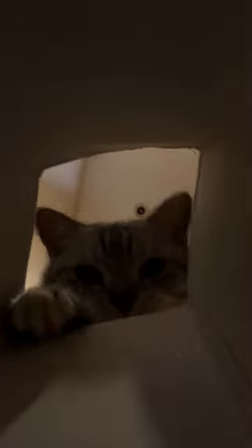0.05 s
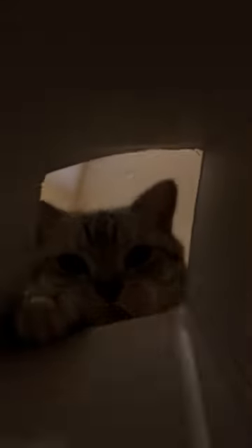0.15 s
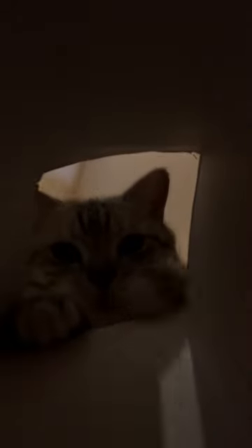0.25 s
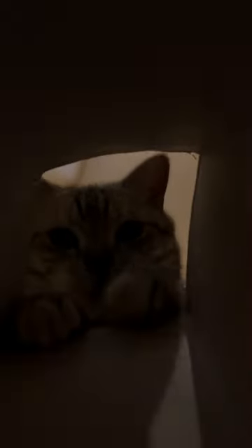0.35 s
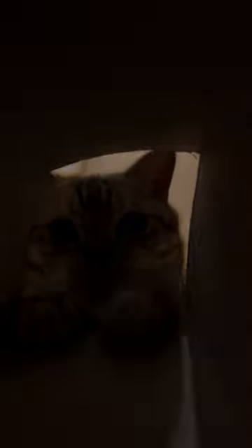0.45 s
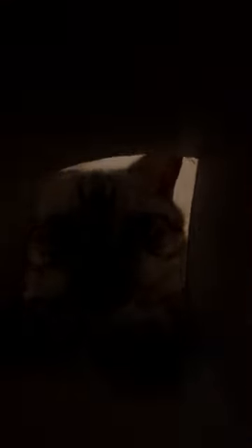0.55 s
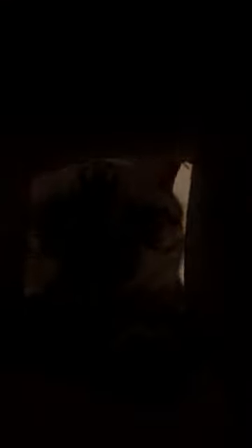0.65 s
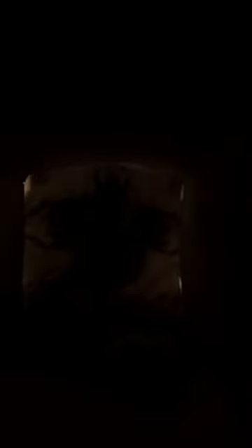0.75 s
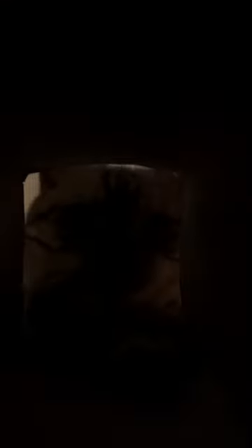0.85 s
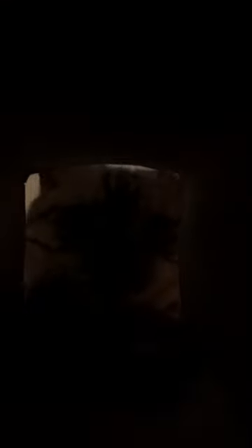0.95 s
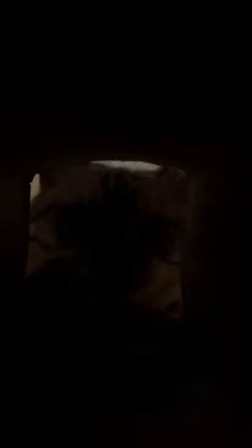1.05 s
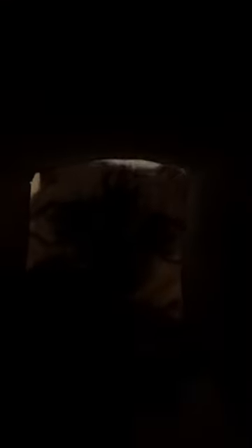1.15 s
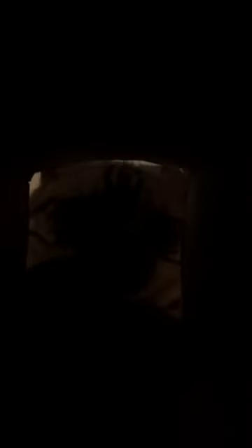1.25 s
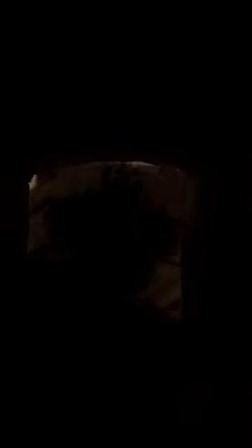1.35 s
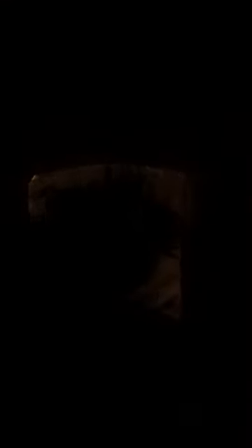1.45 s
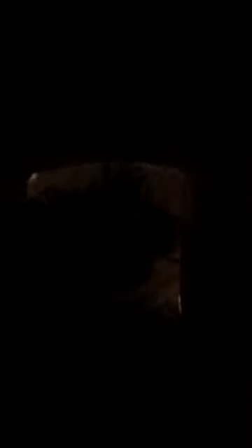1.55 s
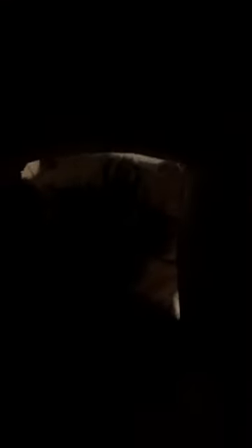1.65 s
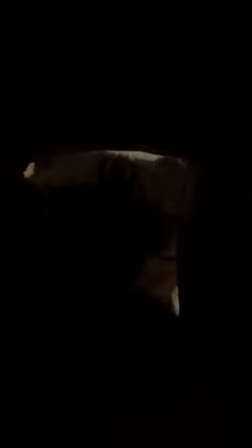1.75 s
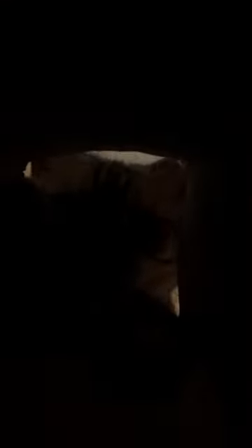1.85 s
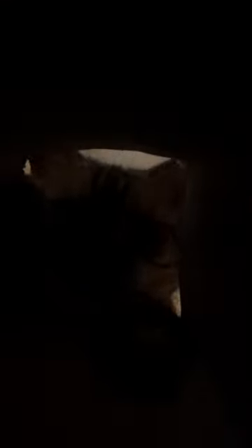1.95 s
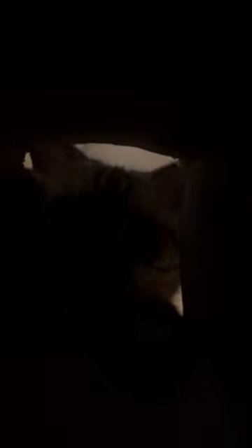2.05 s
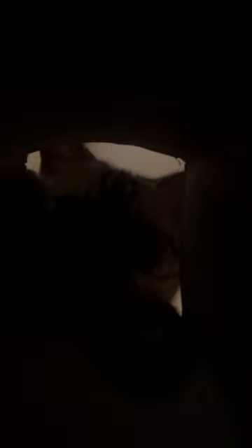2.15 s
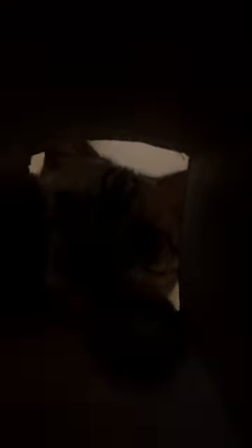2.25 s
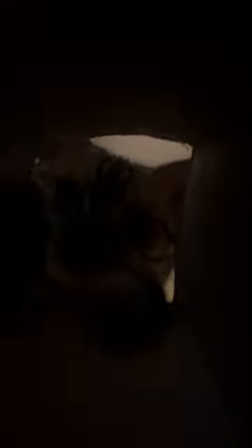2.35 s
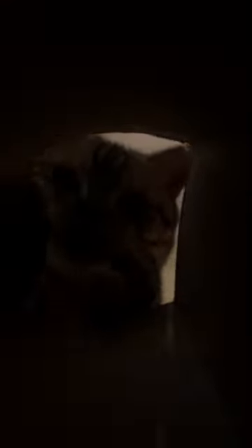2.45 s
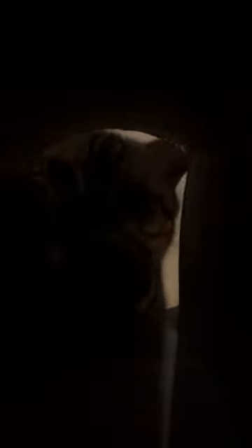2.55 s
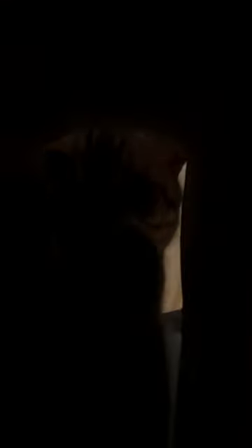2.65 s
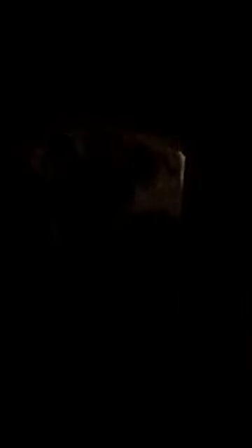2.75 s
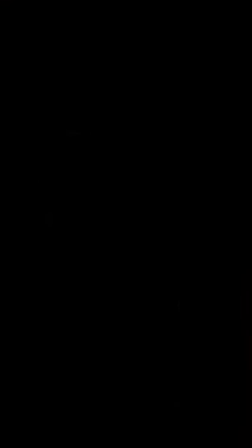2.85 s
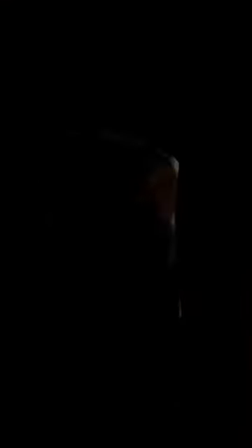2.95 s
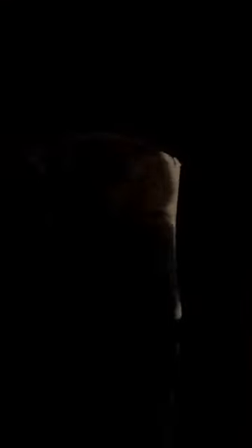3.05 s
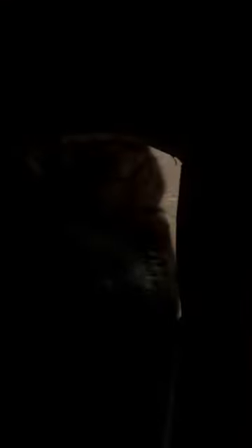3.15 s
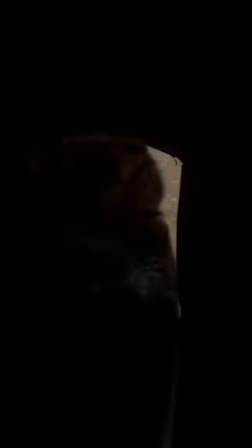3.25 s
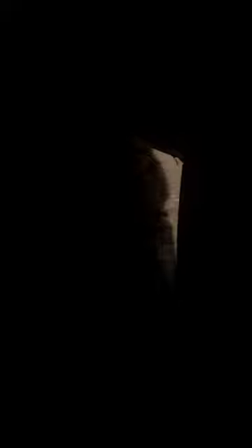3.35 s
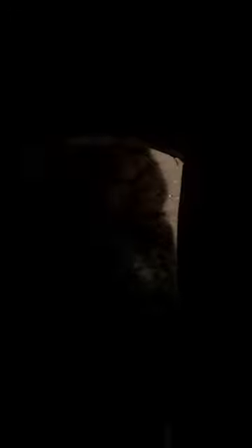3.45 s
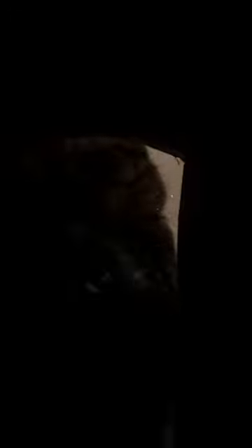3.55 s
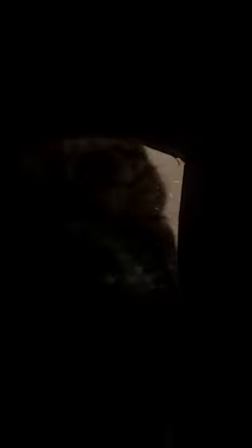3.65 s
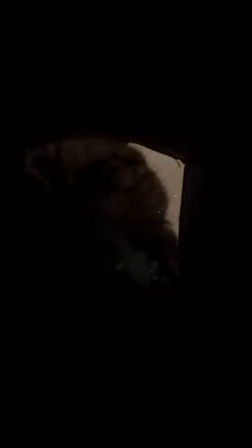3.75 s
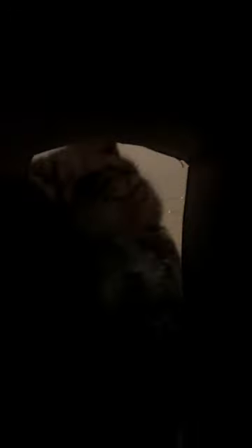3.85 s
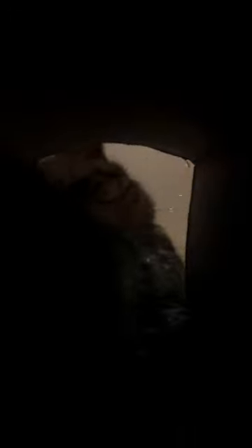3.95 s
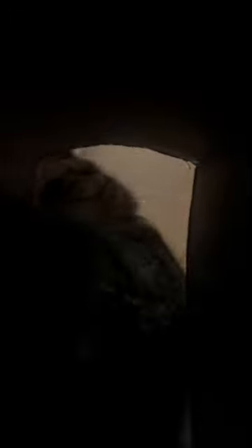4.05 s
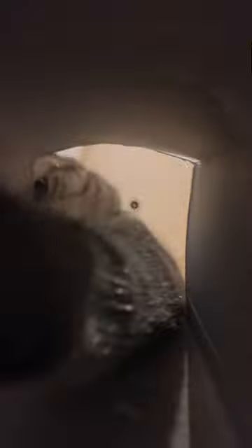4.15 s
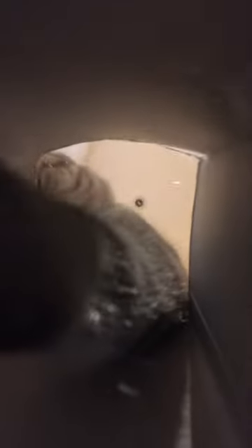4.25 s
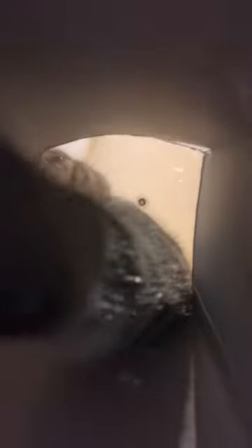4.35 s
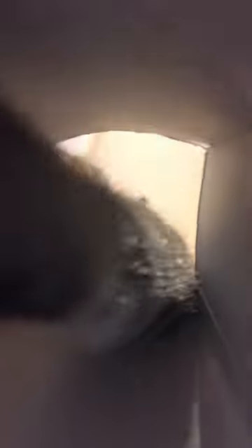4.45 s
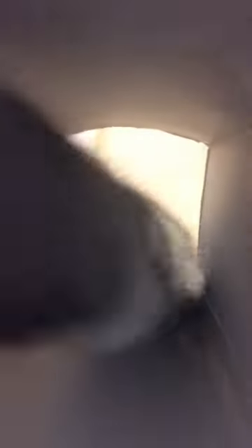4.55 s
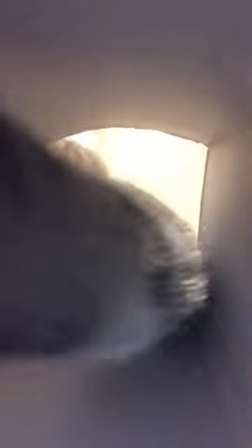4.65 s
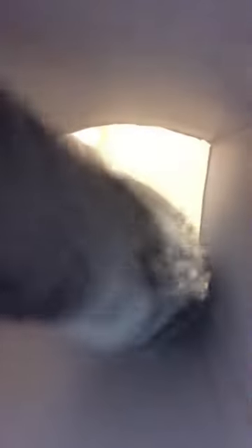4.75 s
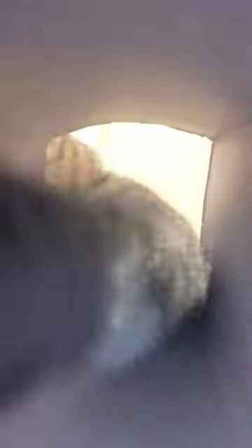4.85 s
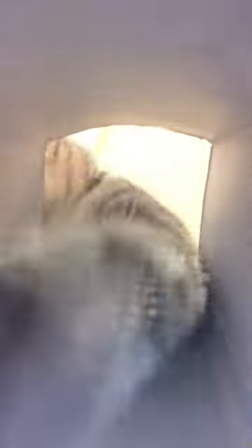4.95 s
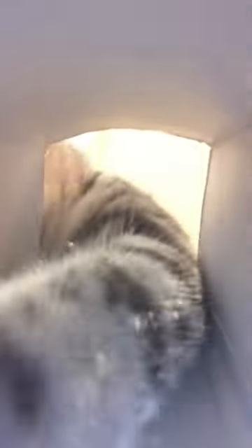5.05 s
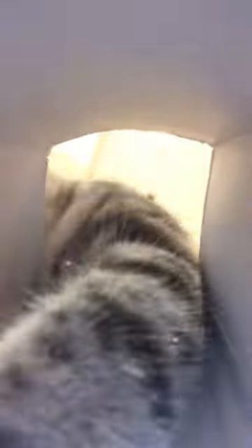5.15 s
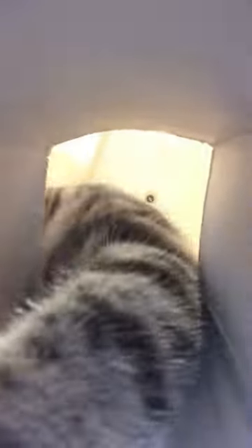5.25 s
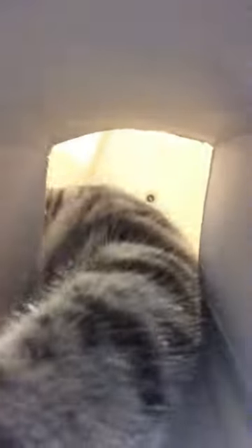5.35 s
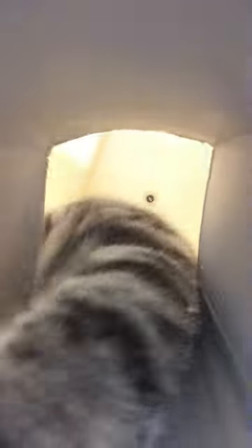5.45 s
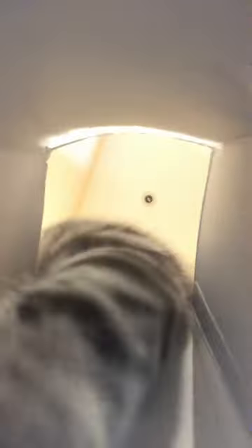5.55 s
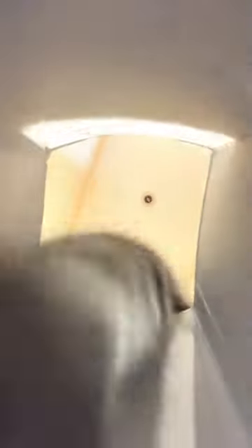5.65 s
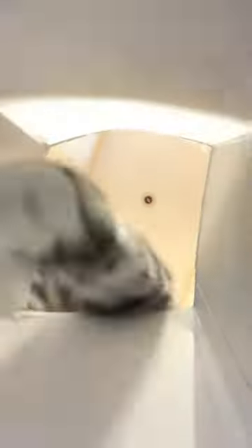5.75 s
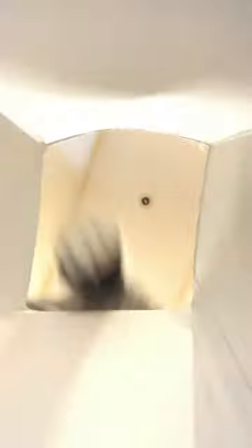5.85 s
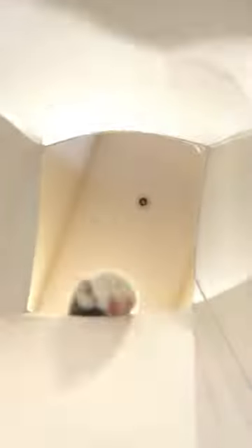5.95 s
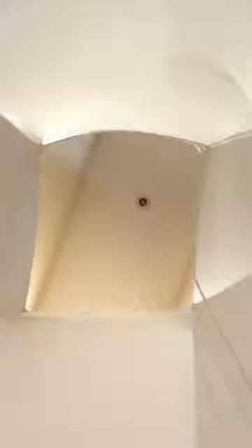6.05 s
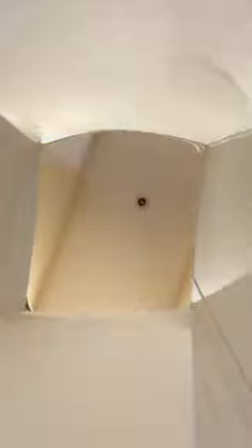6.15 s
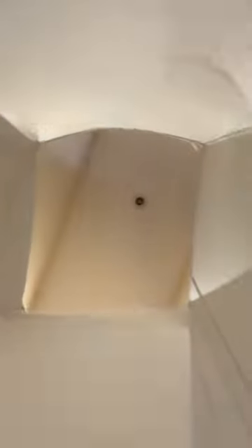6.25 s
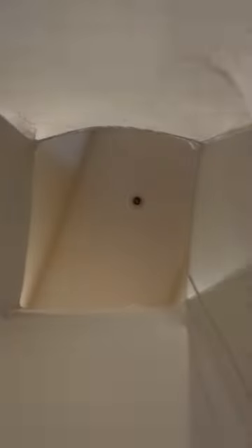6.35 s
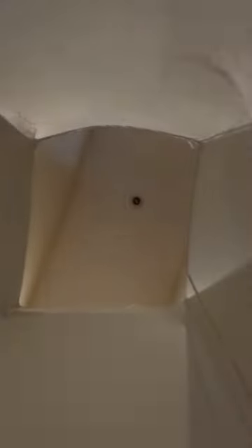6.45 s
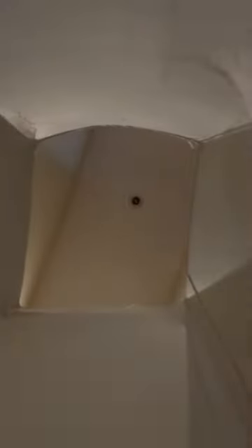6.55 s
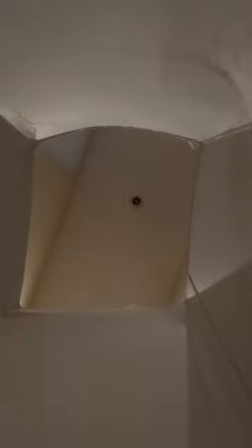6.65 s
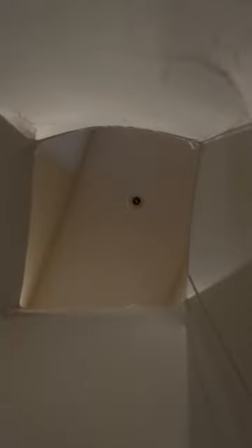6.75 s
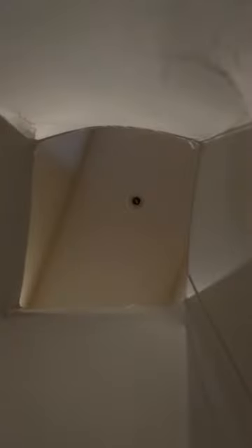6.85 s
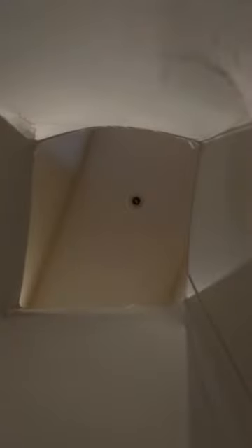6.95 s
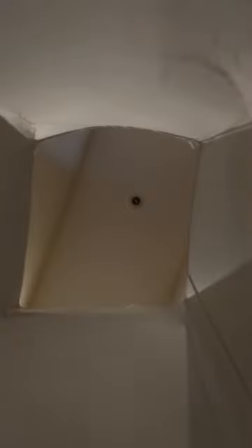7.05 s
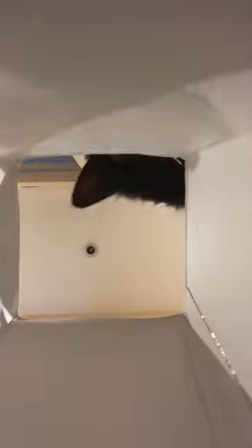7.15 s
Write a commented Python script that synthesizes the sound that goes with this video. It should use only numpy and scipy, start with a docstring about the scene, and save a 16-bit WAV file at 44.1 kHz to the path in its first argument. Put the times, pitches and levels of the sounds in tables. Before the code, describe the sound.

Close, hollow taps, claw clicks and fur dragging on cardboard as a cat reaches into a box, with soft ventilation behind.

```python
"""Inside a cardboard box, as a cat bats, claws and rubs its way in.
Pads thump, claw tips click and scratch, fur drags over the card in tiny stick-slips.
Each contact crosses the card as a bending wave, treble first, so a tap is a short falling chirp.
The panels boom and ring briefly; ventilation noise and a low room hum lie behind."""
import sys
import numpy as np
from scipy import signal
from scipy.fft import rfft, irfft, next_fast_len
from scipy.io import wavfile
from scipy.ndimage import map_coordinates

SR = 44100
rng = np.random.default_rng(int(sys.argv[2]) if len(sys.argv) > 2 else 0)


def transcribe(u):
    """Save the signal u as a 16-bit wav file named by the first command-line argument.

    u: samples, shape (n,) or (channels, n), limited to [-1, 1]; the rate is SR.
    q: integer samples, one column per channel.
    """
    v = np.clip(np.atleast_2d(u).T, -1, 1)
    q = np.round(v * 32767).astype(np.int16)
    wavfile.write(sys.argv[1], SR, q)


N = 317961
TIME_S = np.arange(N) / SR

# Table levels are relative.
# ventilation spectrum: f/Hz, level/dB
VENT_SPECTRUM = [(25, -51), (60, 10.5), (110, -20), (200, -3.5), (360, -2), (560, -5.5), (760, -2),
                 (1100, -15.5), (1900, -29), (3000, -27.5), (5000, -38.5), (7500, -35), (11000, -37),
                 (16000, -37.5)]
# air modes of the box: f/Hz, width/Hz, level/dB
AIR_MODES = [(640, 56, -17), (661, 260, -4), (1230, 160, 1), (1487, 260, 6.5), (2160, 170, 5),
             (2520, 92, 6), (4940, 450, 8)]
# hum tones: f/Hz, level/dB
HUM_TONES = [(110, -43.5), (90.4, -49.5), (120, -52.5), (193, -62)]
# steady rubbing as the cat leans in: t/s, level/dB
LEAN_CURVE = [(0, -41.5), (0.6, -40.5), (0.88, -48.5), (1.4, -46), (1.57, -34), (1.78, -46), (2.6, -48),
              (2.9, -35), (3.17, -45.5), (3.7, -40), (4.1, -33), (4.48, -31), (4.72, -37), (5.05, -39.5),
              (5.28, -51), (5.65, -38), (6.15, -45.5), (7.1, -44)]
# leg sweeps: centre t/s, half-height width/s, rub level/dB, hiss re rub/dB
LEG_SWEEPS = [(0.22, 0.26, -60, -6), (0.58, 0.4, -49, -11), (1.028, 0.079, -35, -35),
              (1.448, 0.12, -37, -4.5), (1.668, 0.096, -31, -30), (1.988, 0.11, -32, -27),
              (2.222, 0.11, -36, -20.5), (2.348, 0.14, -41.5, -12.5), (2.762, 0.15, -31, -17),
              (2.868, 0.077, -22.5, -19), (3.108, 0.031, -19.5, -18.5), (3.225, 0.035, -24, -22),
              (3.582, 0.022, -34.5, -19), (3.792, 0.052, -26, -38), (4.038, 0.023, -43.5, 4),
              (4.172, 0.047, -38.5, -5.5), (4.318, 0.04, -30, -31), (4.808, 0.11, -29, -22),
              (5.128, 0.11, -32.5, -16), (5.462, 0.069, -32.5, -27), (5.568, 0.1, -30.5, -16),
              (5.708, 0.077, -35, -14), (5.952, 0.18, -36, -11), (6.89, .07, -47.5, -33)]
# low friction band: f/Hz, level/dB
RASP_SPECTRUM = [(40, -15), (100, -5.5), (200, -5), (380, -1), (580, -8.5), (900, -15), (1400, -18.5),
                 (2500, -27), (4300, -30.5), (6500, -42.5)]
# middle friction band: f/Hz, level/dB
SCRATCH_SPECTRUM = [(700, -16.5), (1600, -5.5), (2400, -4.5), (3200, -9.5), (4400, -11), (7000, -22),
                    (12000, -32)]
# high friction band: f/Hz, level/dB
HISS_SPECTRUM = [(1500, -5), (3000, -5), (4800, -2), (7000, -5.5), (11000, -6.5), (15000, -9.5),
                 (17000, -37)]
# paw blows: t/s, level/dB, corner f/Hz, treble roll-off/(dB/oct)
PAW_TAPS = [(0.1025, 24.5, 313, 8.5), (0.1305, 11.5, 202, 3), (0.3377, 23, 525, 10.5), (0.483, 21, 680, 20),
            (0.916, 24, 344, 8.5), (0.9603, 21.5, 378, 12.5), (1.0093, 19.5, 127, 3.5),
            (1.0197, 26.5, 315, 12), (1.0465, 33.5, 610, 15.5), (1.1168, 24, 370, 5.5),
            (1.516, 30.5, 386, 12), (1.6135, 28, 310, 12), (1.6458, 41, 235, 12), (1.6628, 23.5, 225, 4.5),
            (1.8265, 21, 211, 13.5), (1.9332, 25.5, 148.3, 7.5), (1.952, 31.5, 244, 14),
            (2.014, 24, 120, 7), (2.538, 40, 150, 20.5), (2.8095, 40, 484, 11), (2.8126, 39.5, 129, 11.5),
            (2.8438, 32.5, 380, 9.5), (2.9122, 38, 200, 6), (2.9322, 32, 115, 5), (2.969, 31.5, 115, 7),
            (2.9892, 37, 472, 14), (3.0624, 25, 604, 7), (3.0786, 33.5, 130, 5.5), (3.1008, 34, 422, 22),
            (3.1482, 11.5, 900, 6.5), (3.205, 33, 195, 8.5), (3.2498, 33, 139, 7), (3.2818, 14, 546, 5.5),
            (3.328, 28.5, 121, 4.5), (3.351, 39, 148, 9), (3.3991, 41, 540, 13.5), (3.416, 30.5, 109.4, 20),
            (3.5158, 27.5, 595, 15), (3.5255, 38, 473, 8), (3.529, 36.5, 126, 12), (3.5535, 34, 463, 15.5),
            (3.6315, 19.5, 330, 5), (3.7948, 46, 320, 18.5), (3.812, 37.5, 255, 16),
            (3.8933, 29.5, 477, 10), (3.9272, 32, 310, 6.5), (3.936, 41, 218, 11), (4.0091, 32.5, 140, 5.5),
            (4.1792, 28.5, 265, 22), (4.1937, 30.5, 103, 27), (4.2648, 28, 245, 16), (4.299, 33, 290, 11),
            (4.3543, 24.5, 305, 8), (4.4624, 26.5, 500, 21), (4.5404, 33.5, 158, 6.5), (4.617, 41, 474, 10),
            (4.629, 28, 113, 22), (4.8116, 36, 284, 12), (4.8433, 29.5, 129, 5), (4.8967, 24.5, 129, 6.5),
            (4.9953, 27, 260, 4.5), (5.0272, 40.5, 598, 19), (5.0435, 32, 119.4, 14),
            (5.1127, 41.5, 116, 8), (5.1135, 30.5, 550, 28), (5.117, 47, 85.4, 13.5),
            (5.1345, 32.5, 510, 18.5), (5.521, 46, 140, 12.5), (5.8997, 38, 114, 20),
            (5.9142, 38, 261, 10.5), (5.94, 32, 102, 24), (6.0035, 31, 766, 14.5), (6.0242, 36.5, 287, 19),
            (6.0426, 32, 141, 13), (6.878, 18, 370, 21), (6.951, 13, 356, 11)]
# response of a furry pad: f/Hz, level/dB
PAD_RESPONSE = [(35, 2), (80, 1), (120, -1), (180, -0.5), (270, -1.5), (500, -3.5), (800, -5.5),
                (1300, -3.5), (3000, -12.5), (12000, -17.5)]
# claws snapping free: t/s, level/dB, corner f/Hz, treble roll-off/(dB/oct)
CLAW_CLICKS = [(0.7865, -7, 2900, 13.5), (0.968, -6, 2000, 10), (1.007, -8, 2000, 4.5),
               (1.047, 8.5, 1900, 6), (1.0548, 9, 5600, 9.5), (1.1178, 7.5, 1940, 1.5),
               (1.2228, -11, 4200, 3), (1.5798, 0, 2400, 1), (1.5952, 22.5, 2060, 10),
               (1.7096, -0.5, 9000, 7), (1.944, 5.5, 3700, 6.5), (1.9535, -3, 3000, 4),
               (1.985, 12.5, 2520, 3.5), (2.05, -8, 6000, 3), (2.81, 11.5, 3400, 9),
               (2.8139, 18.5, 2000, 8.5), (2.9474, 17, 5070, 6), (2.9646, 7.5, 3600, -1),
               (2.988, 25, 1886, 12.5), (3.0089, 19.5, 1720, 18), (3.0477, 14, 3290, 9.5),
               (3.063, 6, 5050, 11), (3.078, 6, 2400, 11), (3.178, -5, 4760, 12), (3.2145, -0.5, 4200, 15),
               (3.2477, 8.5, 5300, 10), (3.3297, 13.5, 2570, 19), (3.4049, 12.5, 2000, 2),
               (3.5235, 18, 2060, 15), (3.5532, 16.5, 3000, 14.5), (3.8803, -4, 3400, 11),
               (3.894, 10.5, 1650, 18), (3.936, -7, 4800, 4.5), (4.072, 0.5, 5040, 5),
               (4.5755, -4, 4000, 7), (4.586, 4.5, 4870, 8), (4.5972, 10, 2050, 6), (4.8808, 0, 4200, 2.5),
               (4.886, 2.5, 3970, 5.5), (5.0406, 2.5, 4540, 18), (5.507, 9.5, 1880, 11.5),
               (6.2603, -4, 6800, 8)]
# response of a claw tip: f/Hz, level/dB
TIP_RESPONSE = [(250, 2), (1200, 1), (10000, -1.5), (16000, 0), (18000, -20)]
# claw drags: start t/s, end t/s, bite time/s, rasp level/dB, scratch level/dB, hiss level/dB
CLAW_DRAGS = [(1.382, 1.49, 0.11, -35, -51, -52), (2.896, 2.923, 0.02, -14, -30, -31),
              (2.937, 2.958, 0.016, -18.5, -16.5, -19.5), (3.351, 3.404, 0.0062, -20.5, -26, -33),
              (3.997, 4.033, 0.0083, -18, -38.5, -40), (4.647, 4.672, 0.059, -23, -30.5, -53),
              (4.943, 4.994, 0.0034, -20, -31, -37), (5.869, 5.923, 0.008, -24, -40.5, -48),
              (5.991, 6.034, 0.034, -21, -47, -42.5)]
# card panel modes: f/Hz, width/Hz, level/dB
PANEL_MODES = [(102, 48.5, 6), (162, 28, -9), (332, 55, -13), (399, 5.7, -23), (555, 81, 0), (700, 43, -1),
               (821, 22, -6), (1070, 22, -2.5), (1293, 120, -15), (1362, 22, -7), (2050, 170, -17.5),
               (2285, 210, -4), (2510, 72, -23), (3300, 70, -26.5), (4110, 70, -20.5), (4280, 360, -8.5),
               (4700, 228, -20)]


def undb(db):
    """Decibels to gain."""
    return 10 ** (np.asarray(db) / 20)


def unit_rms(x):
    """Scale to rms 1."""
    return x / np.sqrt(np.mean(x ** 2))


def bins_hz(size):
    """FFT bin frequencies, floored at 1 Hz."""
    return np.maximum(np.fft.rfftfreq(size, 1 / SR), 1)


def curve_db(f_hz, points):
    """Interpolate (f/Hz, level/dB) points over log frequency."""
    hz, db = np.transpose(points)
    return np.interp(np.log(f_hz), np.log(hz), db)


def colour(x, points):
    """Filter by (f/Hz, level/dB) points."""
    return irfft(rfft(x) * undb(curve_db(bins_hz(len(x)), points)), len(x))


def wander(rate_hz):
    """Random drift, spread near 1."""
    knots = rng.standard_normal(4096)
    return 1.31 * np.interp(TIME_S * rate_hz, np.arange(len(knots)), knots)


def resonate(x, modes, direct_db):
    """Direct path plus damped modes."""
    f = bins_hz(N)
    response = sum(undb(db) / (1 + 1j * (f * f - hz * hz) / (f * width)) for hz, width, db in modes)
    return irfft(rfft(x) * (undb(direct_db) + response), N)


def ventilation(level_db=-46, waver_db=0.26):
    """Room air noise, coloured by the air in the box."""
    air = resonate(colour(rng.standard_normal(N), VENT_SPECTRUM), AIR_MODES, direct_db=-5.5)
    return unit_rms(air) * undb(level_db + waver_db * wander(3.1))


def hum(waver_db=1.6, drift_hz=1.25, onset_db=-12, rise_s=1.25):
    """Low wavering tones that grow at first."""
    tones = np.zeros(N)
    for hz, db in HUM_TONES:
        rms = undb(db + waver_db * wander(5))
        phase = 2 * np.pi * np.cumsum(hz + drift_hz * wander(3.9)) / SR
        tones += np.sqrt(2) * rms * np.sin(phase)
    return tones * undb(onset_db * np.clip(1 - TIME_S / rise_s, 0, 1))


def friction(spectrum, slips_per_s, spread_db, judder_db, fold_s=0.0012):
    """Fibres catch and slip: a juddering stream of tiny uneven clicks."""
    slips = (rng.random(N) < slips_per_s / SR) * rng.standard_normal(N)
    slips *= undb(spread_db * np.clip(rng.standard_normal(N), -2, 2))
    slips *= undb(judder_db * wander(90))
    # the nearest fold's echo moves with the paw; the card absorbs its treble
    delay_s = fold_s * np.exp(0.35 * wander(9))
    echo = map_coordinates(slips, [(TIME_S - delay_s) * SR], order=0)
    echo = colour(echo, [(2500, -4), (5000, -7), (10000, -14)])
    return unit_rms(colour(slips + echo, spectrum))


def lean_db():
    """Steady rubbing level per sample."""
    return np.interp(TIME_S, *np.transpose(LEAN_CURVE))


def fur(lean_rub_db=-3, lean_hiss_db=-30, sweep_db=-2):
    """Leg and chest slide along the opening: dull rub and fine hiss, swelling with each sweep."""
    rub_power = undb(lean_db() + lean_rub_db) ** 2
    hiss_power = undb(lean_db() + lean_hiss_db) ** 2
    for centre_s, width_s, db, hiss_db in LEG_SWEEPS:
        swell = undb(db + sweep_db) * np.hanning(int(2 * width_s * SR))
        start = int((centre_s - width_s) * SR)
        add(rub_power, swell ** 2, start)
        add(hiss_power, (swell * undb(hiss_db)) ** 2, start)
    rub = friction(RASP_SPECTRUM, slips_per_s=2200, spread_db=1, judder_db=2.5)
    hiss = friction(HISS_SPECTRUM, slips_per_s=10000, spread_db=1.5, judder_db=3.5)
    return np.sqrt(rub_power) * rub + np.sqrt(hiss_power) * hiss


def add(out, x, start):
    """Mix x into out from sample start."""
    a, b = max(start, 0), min(start + len(x), N)
    out[a:b] += x[a - start:b - start]


def contact(t60_s, scatter_db, echo_s, echo_db, size=4096, folds=3):
    """One push, fold echoes and a dying scatter, starting mid-buffer."""
    t = np.arange(size) / SR
    scatter = rng.standard_normal(size) * undb(-60 * t / t60_s) * (1 - np.exp(-10 * t / t60_s))
    push = undb(scatter_db) * scatter / np.linalg.norm(scatter)
    push[0] = 1
    # fold distances vary by spot: each contact has its own hollow colour
    echoes = np.zeros(size)
    signs = rng.choice([-1, 1], folds)
    delays = (echo_s * SR * rng.uniform(0.2, 1, folds)).astype(int)
    echoes[delays] = signs
    push += undb(echo_db) * colour(echoes, [(250, -16.5), (700, -2)])
    return np.pad(push / np.linalg.norm(push), (size, 0))


def blows(events, surface, bass_db_per_oct, **contact_settings):
    """Contacts rolled off either side of a corner frequency, coloured by the touching surface."""
    force = np.zeros(N)
    for t_s, db, corner_hz, treble_db_per_oct in events:
        f_hz = np.sort(np.append(np.geomspace(30, 18000, 40), corner_hz))
        octaves = np.log2(f_hz / corner_hz)
        rolloff_db = np.minimum(bass_db_per_oct * octaves, -treble_db_per_oct * octaves)
        spectrum = np.column_stack([f_hz, db + rolloff_db + curve_db(f_hz, surface)])
        blow = colour(contact(**contact_settings), spectrum)
        add(force, blow, int(t_s * SR) - len(blow) // 2)
    return force


def toe_taps(count=30, over_lean_db=51, spread_db=3, centre_hz=480, treble_db_per_oct=13):
    """Rows of light random touches, denser and firmer as the cat leans harder."""
    rub_db = lean_db()
    effort = np.cumsum(undb(rub_db) ** 4)
    jitter, strength, spot = rng.random((count, 3)).T
    onsets = np.searchsorted(effort / effort[-1], (np.arange(count) + jitter) / count)
    levels_db = rub_db[onsets] + over_lean_db + spread_db * (2 * strength - 1)
    corners_hz = centre_hz * 2 ** (spot - 0.5)
    return [(*tap, treble_db_per_oct) for tap in zip(TIME_S[onsets], levels_db, corners_hz)]


def paws():
    """Pads thump low, toes knock higher; a softer push has less treble."""
    return blows(list(PAW_TAPS) + toe_taps(), PAD_RESPONSE, bass_db_per_oct=11,
                 t60_s=0.04, scatter_db=-6.5, echo_s=0.006, echo_db=-5.5)


def claws():
    """Hard tips click briefly; a blunter catch has less treble."""
    return blows(CLAW_CLICKS, TIP_RESPONSE, bass_db_per_oct=8,
                 t60_s=0.027, scatter_db=-18, echo_s=0.0018, echo_db=-7.5)


def scratches(release_s=0.007, band_gains_db=(-2, -1, 0)):
    """Short hard claw drags: bite, hold, let go."""
    envelopes = np.zeros((3, N))
    for start_s, end_s, bite_s, *bands_db in CLAW_DRAGS:
        ramps = np.minimum((TIME_S - start_s) / bite_s, (end_s - TIME_S) / release_s)
        grip = np.clip(ramps + 0.5, 0, 1)
        envelopes += np.outer(undb(np.add(bands_db, band_gains_db)), grip)
    return sum(envelope * friction(spectrum, slips_per_s=3100, spread_db=4, judder_db=3)
               for envelope, spectrum in zip(envelopes, (RASP_SPECTRUM, SCRATCH_SPECTRUM, HISS_SPECTRUM)))


def bending_wave(force, lag_s, ref_hz=500, dispersion=0.75):
    """Bass arrives last: group delay is lag_s * (ref_hz / f) ** dispersion."""
    size = next_fast_len(N + SR)
    power = 1 - dispersion
    phase = 2 * np.pi * lag_s * ref_hz * (bins_hz(size) / ref_hz) ** power / power
    return irfft(rfft(force, size) * np.exp(-1j * phase), size)[:N]


def box(taps_and_drags, clicks):
    """Taps and drags take a long path through the card, clicks a short one; both ring the panels."""
    waves = bending_wave(taps_and_drags, lag_s=0.0035) + bending_wave(clicks, lag_s=0.0009)
    return resonate(waves, PANEL_MODES, direct_db=-2)


def scene():
    """The cat through the box, the room behind; mono."""
    cat = box(paws() + scratches() + fur(), claws())
    return (cat + ventilation() + hum())[None]


def record(dry, ceiling=0.98, cutoff_hz=16300):
    """Round the loudest peaks, then low-pass."""
    rounded = dry / (1 + (dry / ceiling) ** 6) ** (1 / 6)
    lowpass = signal.ellip(8, 0.2, 70, cutoff_hz, fs=SR, output="sos")
    return signal.sosfilt(lowpass, rounded)


dry = scene()
out = record(dry)
transcribe(out)
```